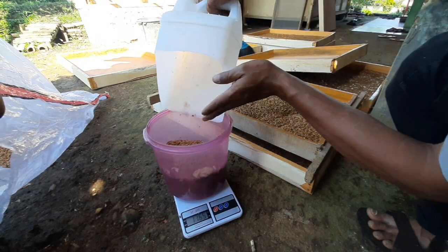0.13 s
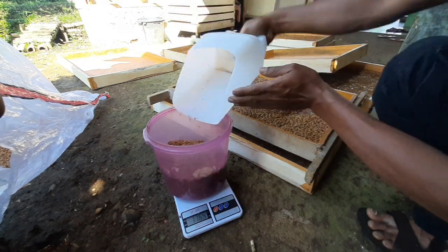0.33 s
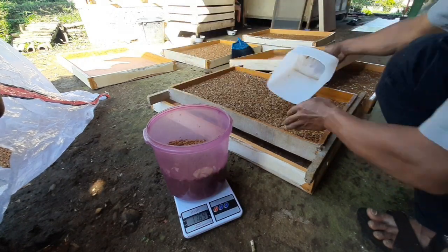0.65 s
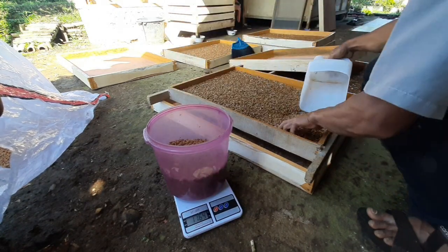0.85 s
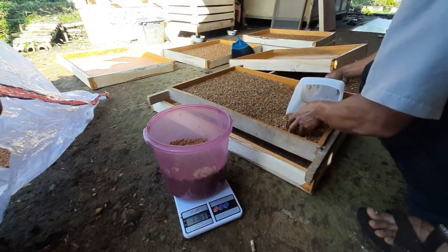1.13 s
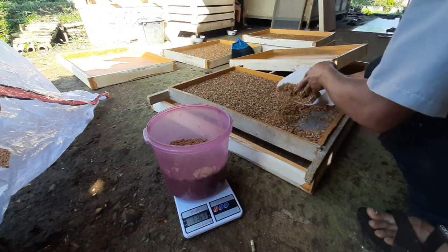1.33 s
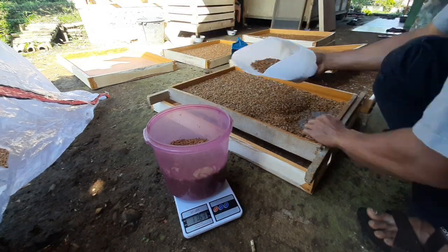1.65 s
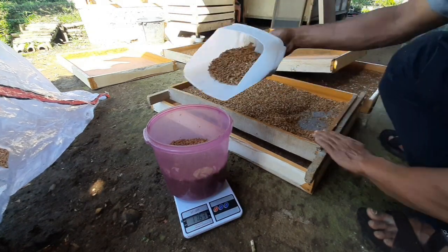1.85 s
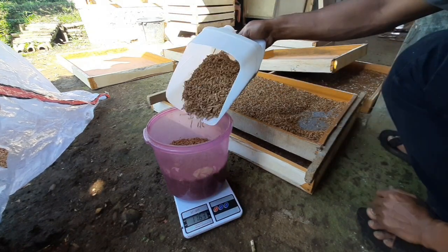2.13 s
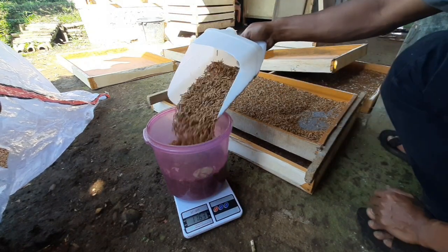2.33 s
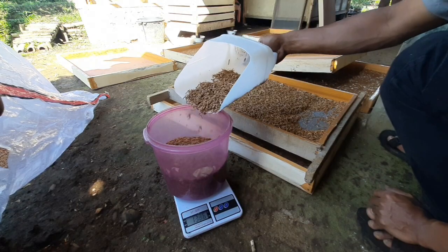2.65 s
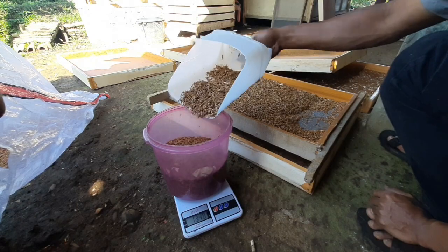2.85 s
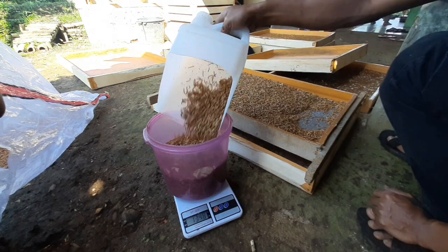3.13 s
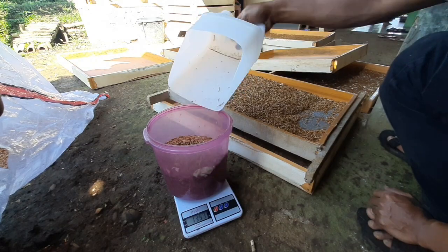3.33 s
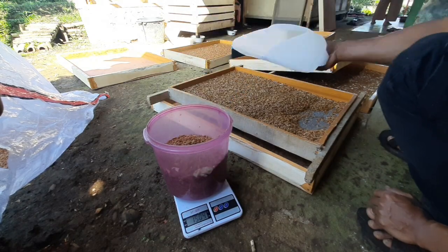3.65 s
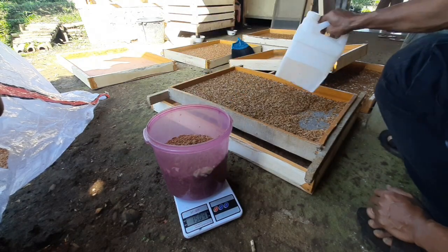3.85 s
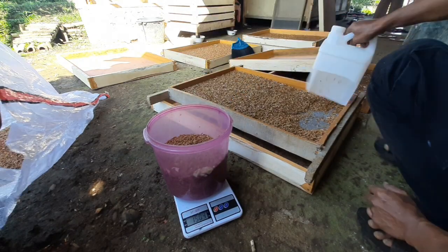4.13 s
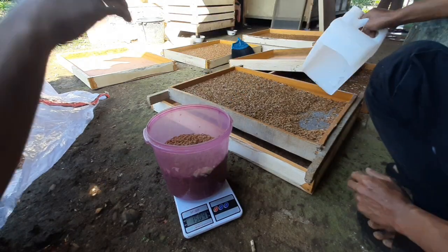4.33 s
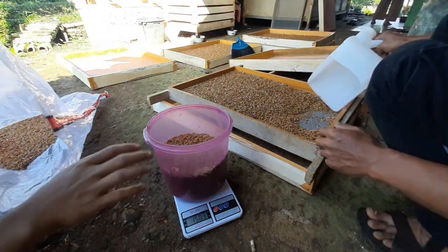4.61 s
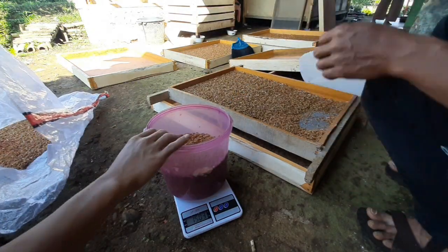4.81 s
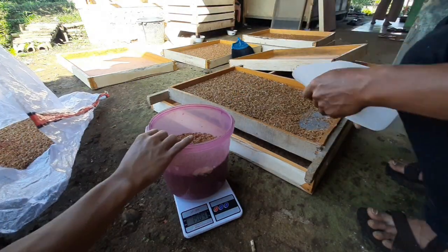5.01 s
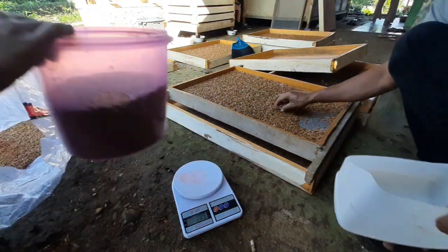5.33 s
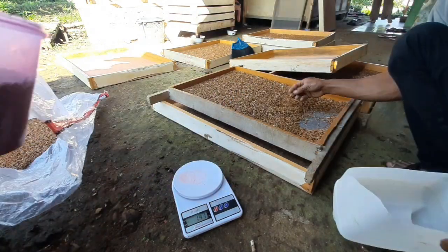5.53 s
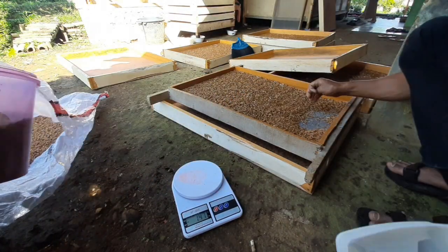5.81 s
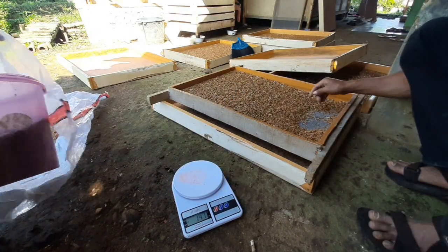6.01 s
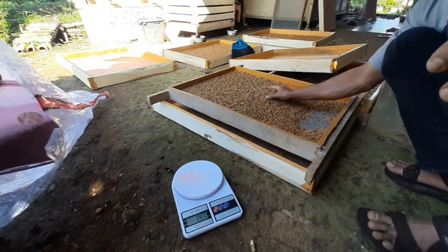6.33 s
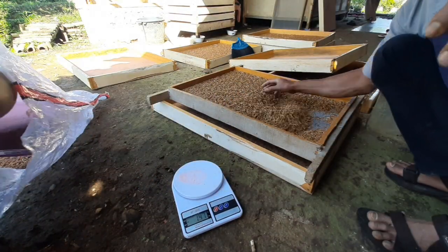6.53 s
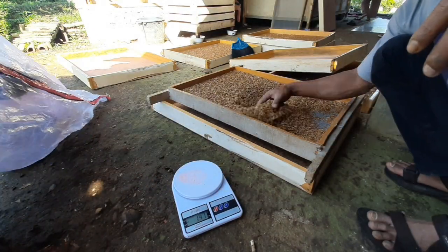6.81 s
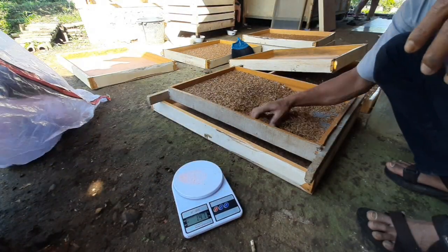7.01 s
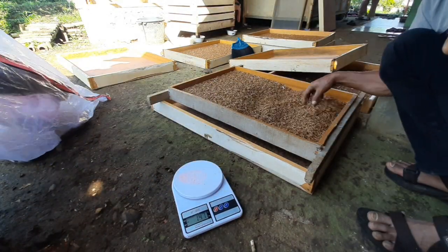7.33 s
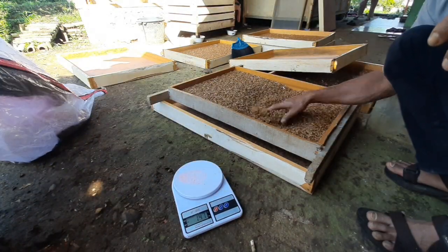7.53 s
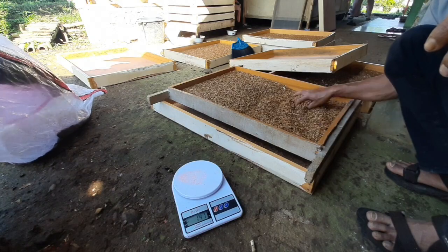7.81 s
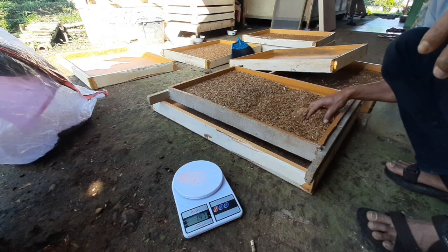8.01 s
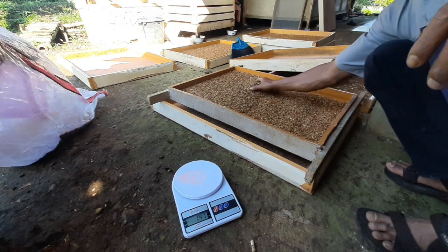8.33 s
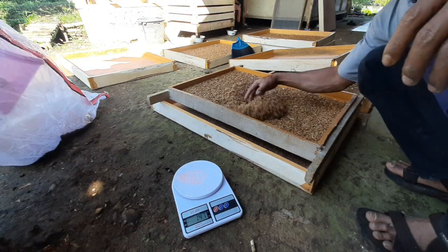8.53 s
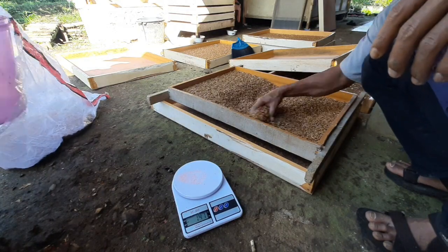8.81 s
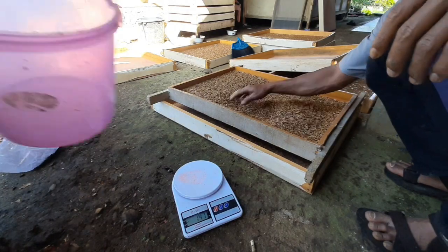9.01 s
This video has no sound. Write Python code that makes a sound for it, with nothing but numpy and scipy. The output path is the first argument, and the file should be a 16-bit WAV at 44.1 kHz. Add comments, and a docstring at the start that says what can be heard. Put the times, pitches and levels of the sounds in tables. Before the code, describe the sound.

A faint low rumble and distant drone run throughout, under an open shed. Light plastic taps open the scene. From about 0.8 to 1.6 seconds a plastic jug scrapes through a wooden tray, scooping small worms, with a thud at 1.4. The worms slide into a bucket in two soft, fizzing pours around 2.3 and 3.2 seconds, followed by a tiny high squeak. Clothing rustles, and the empty jug knocks loudly and hollowly on the tray at 4.2 and 4.5 seconds. A plastic sack crinkles from about 5.2 to 6.6, while the jug scuffs and gives another loud clunk at 6. From 7 seconds a hand stirs the worms in repeated grainy sweeps over the rumbling tray bottom, strongest around 8.5, with a sharp plastic snap at 8.7. A bird gives one faint, short buzz at about 9 seconds.

```python
"""Under an open shed, with a drone far away, a cut plastic jug scrapes and bumps through a wooden tray.
It scoops up small live worms and pours them into a bucket, a fizz of tiny contacts; something squeaks.
The empty jug is knocked on the tray, its hollow walls ringing; a plastic sack crinkles as it is set down.
Then a hand stirs the worms over the rumbling tray bottom, and at the end a bird buzzes once."""
import sys
import numpy as np
from scipy import signal
from scipy.fft import rfft, irfft, next_fast_len
from scipy.io import wavfile
from scipy.ndimage import uniform_filter1d

SR = 44100
rng = np.random.default_rng(int(sys.argv[2]) if len(sys.argv) > 2 else 0)


def wav_out(sig):
    """Save sig, one row per channel (or a flat mono array), as 16-bit PCM at SR to the path in sys.argv[1]."""
    wavfile.write(sys.argv[1], SR, np.round(np.clip(np.atleast_2d(sig).T, -1, 1) * 32767).astype(np.int16))


N = 404075
T = np.arange(N) / SR
HIT_T = T[:SR // 3]
LEFT_LAG_S = 0.00024  # the jug reaches the right side first


def amp(db):
    return 10 ** (np.asarray(db) / 20)


def unit_power(x):
    return x / np.sqrt(np.mean(x ** 2) + 1e-20)


def unit_attack(x):
    """Scales a hit to unit power over its first 20 ms."""
    return x / np.sqrt(np.mean(x[..., :SR // 50] ** 2) + 1e-20)


def curve_at(points, hz):
    points_hz, values = np.transpose(points)
    return np.interp(np.log(hz + 1), np.log(points_hz + 1), values)


def add(mix, start_s, sound):
    part = mix[:, max(round(start_s * SR), 0):][:, :sound.shape[-1]]
    part += sound[..., :part.shape[1]]


def swells(rows):
    """One envelope per level column; rise and fall each span 20 dB, and overlaps add in power."""
    t, power = T[::32], 0
    shape = 1.45  # 1 = pointed, 2 = bell
    for peak_s, rise_s, fall_s, *levels_db in rows:
        away = np.maximum((peak_s - t) / rise_s, (t - peak_s) / fall_s)
        power = power + amp(np.array(levels_db)[:, None] - 20 * np.abs(away) ** shape) ** 2
    return [np.interp(T, t, np.sqrt(p)) for p in power]


# Stereo image, centred bass and wide treble: frequency_hz, left_right_correlation
STEREO_LIKENESS = [(60, 0.99), (130, 0.66), (290, 0.45), (640, 0.023), (1400, 0), (15000, 0.018)]
def coloured(x, colour):
    """Shapes a stereo pair to a tone colour that rolls off at both ends."""
    size = next_fast_len(x.shape[1])
    hz, z = np.fft.rfftfreq(size, 1 / SR), rfft(x, size)
    same = np.clip(curve_at(STEREO_LIKENESS, hz), -1, 1)
    z = np.array([z[0], same * z[0] + np.sqrt(1 - same ** 2) * z[1]])
    ends = np.minimum(hz / colour[0][0], 1) ** 2 * np.minimum(colour[-1][0] / (hz + 1), 1) ** 2
    return unit_power(irfft(z * amp(curve_at(colour, hz)) * ends, size)[:, :x.shape[1]])


def noise(colour, size=N):
    return coloured(rng.standard_normal((2, size)), colour)


def brightened(colour, top_db):
    """Lifts or lowers the top octave of a colour."""
    return [(hz, db + top_db * np.clip(np.log2(hz / 6500), 0, 1)) for hz, db in colour]


# Low rumble and steady high hiss, their colours: frequency_hz, level_db
RUMBLE = [(25, -25), (45, -7), (90, -9), (130, -5.5), (200, -6.5), (260, -13), (350, -8), (440, -20),
          (600, -24), (900, -34.5)]
AIR = [(500, -6), (1150, -5.5), (3000, -14), (5000, -9), (6200, -2.5), (6800, 5), (7500, -9), (10000, -9.5),
       (12000, -10.5), (15500, -23)]
# Bands of the far drone: pitch_hz, width_hz, start_db, end_db
DRONE = [(125.4, 12, -52.5, -52.5), (158.3, 5.4, -53.5, -66.5), (260.2, 8.1, -57.5, -53.5),
         (319, 11.4, -61.5, -69.5)]
def background():
    """Low rumble and a wavering far drone under a faint hiss."""
    out = amp(-51.5) * noise(RUMBLE) + amp(-64.5) * noise(AIR)
    for hz, width, start_db, end_db in DRONE:
        band = [(hz - 3 * width, -40), (hz - width / 2, -3), (hz, 0),
                (hz + width / 2, -3), (hz + 3 * width, -40)]
        out = out + amp(np.linspace(start_db, end_db, N)) * noise(band)
    return out


# Reverb time under the shed: frequency_hz, t60_s
SHED_DECAY = [(100, 0.42), (500, 0.12), (2000, 0.13), (8000, 0.26), (16000, 0.084)]
def shed(x):
    """A short, diffuse tail from the roof and the stacked trays."""
    hz, t, z = signal.stft(rng.standard_normal((2, SR // 2)), SR, nperseg=256)
    decay = amp(-60 * t / curve_at(SHED_DECAY, hz)[:, None])
    tail = signal.istft(z * decay, SR, nperseg=256)[1]
    tail = tail * np.minimum(T[:tail.shape[1]] / 0.0098, 1)
    return signal.fftconvolve(x, tail / np.linalg.norm(tail[0]), axes=1)[:, :N]


# A bird's buzzing note and a faint, thin squeak: time_s, lowest_pitch_hz, flick_hz, level_db
BIRD = [(9.044, 2950, 30, -58), (9.054, 3100, 60, -73), (9.062, 3700, 1600, -58), (9.085, 3660, 1520, -55),
        (9.122, 3590, 1250, -54.5), (9.135, 3800, 700, -65), (9.16, 3750, 450, -79)]
SQUEAK = [(3.355, 11600, 20, -82), (3.38, 11380, 20, -63), (3.412, 11450, 20, -67), (3.435, 11300, 20, -71),
          (3.475, 10460, 20, -80)]
def chirp(rows, buzz_hz, waver_hz):
    """A whistle that flicks upward from its lowest pitch, fast and unevenly."""
    time_s, lowest_hz, flick_hz, db = np.transpose(rows)
    waver = unit_power(uniform_filter1d(rng.standard_normal((2, N)), 60))
    flick = np.sin(np.pi * np.cumsum(buzz_hz * (1 + .25 * waver), axis=1) / SR) ** 4
    pitch = np.interp(T, time_s, lowest_hz) + np.interp(T, time_s, flick_hz) * flick + waver_hz * waver
    envelope = amp(np.interp(T, time_s, db, left=-120, right=-120))
    return envelope * unit_power(np.sin(2 * np.pi * np.cumsum(pitch, axis=1) / SR))


def grains(colour, per_s, spread_db):
    """Countless tiny contacts, each a half-millisecond puff; spread_db varies their size."""
    sizes = amp(spread_db * np.minimum(rng.exponential(1, N), 4))
    contacts = sizes * (rng.random(N) < per_s / SR)
    power = signal.lfilter([1], [1, -np.exp(-2 / (.0005 * SR))], contacts ** 2)
    return coloured(np.sqrt(power) * rng.standard_normal((2, N)), colour)


def mottled(x, patchy_db):
    """Each clump and crease favours its own pitches for a few hundredths of a second."""
    z = signal.stft(x, SR, nperseg=512, noverlap=384)[2]
    bands = uniform_filter1d(rng.standard_normal(z.shape[1:]), size=5, axis=0)
    patches = unit_power(uniform_filter1d(bands, size=11, axis=1))
    flicker = unit_power(uniform_filter1d(rng.standard_normal(z.shape[2]), size=5))
    depth = curve_at([(2500, 1), (9000, .45)], np.fft.rfftfreq(512, 1 / SR))[:, None]
    gain = amp(patchy_db * (depth * patches + 0.15 * flicker))
    return unit_power(signal.istft(z * gain, SR, nperseg=512, noverlap=384)[1][:, :N])


# Rustle colours, dull and bright: frequency_hz, level_db
BODY = [(250, -4.5), (600, -3.5), (1100, 0), (1700, -3), (2400, -3.5), (3500, -8.5), (6000, -11)]
FIZZ = [(1500, -14.5), (3200, -6), (4500, -3.5), (6000, -2.5), (7600, 2), (9300, -7), (12000, -1.5),
        (14000, -8.5), (16000, -9)]
def rustle(body, fizz, top_db, per_s, spread_db):
    """A dull rubbing and a bright fizz of tiny contacts, each riding its own envelope."""
    dull = mottled(grains(BODY, per_s, spread_db=-1), patchy_db=3)
    bright = mottled(grains(brightened(FIZZ, top_db), per_s, spread_db), patchy_db=5)
    return body * dull + fizz * bright


# Cloth and foot moves: peak_s, rise_s, fall_s, body_db, fizz_db
CLOTH_MOVES = [(0.27, 0.18, .4, -64, -68), (3.315, .025, 0.045, -57, -68), (3.72, 0.38, 0.42, -66.5, -57.5),
               (3.88, 0.11, 0.11, -54.5, -58), (3.965, .04, .05, -54, -60), (4.07, 0.16, 0.39, -59, -56),
               (4.35, 0.44, 0.27, -51.5, -54), (4.78, 0.36, 0.42, -64, -55.5)]
def cloth():
    """Cloth and feet rub as the worker leans and reaches."""
    return rustle(*swells(CLOTH_MOVES), top_db=3, per_s=3300, spread_db=0)


# Sack crinkles: peak_s, rise_s, fall_s, body_db, fizz_db
SACK_CREASES = [(5.265, 0.095, 0.1, -60, -50.5), (5.465, 0.1, 0.11, -49, -45), (5.7, 0.12, 0.6, -60, -53),
                (5.88, .14, 0.24, -45, -49), (6.03, 0.11, 0.15, -62, -45), (6.23, 0.13, 0.19, -54, -54),
                (6.42, 0.19, .13, -46.5, -50), (6.56, 0.16, 0.093, -56.5, -57)]
def sack():
    """The plastic sack creases under the bucket with a coarser grain."""
    return rustle(*swells(SACK_CREASES), top_db=2, per_s=2400, spread_db=-1.5)


# Low colour of a rubbed container: frequency_hz, level_db
THRUM = [(90, 2), (160, -4), (250, 1), (350, 3), (500, -4.5), (700, -7.5), (1200, -68)]
def thrum():
    """The tray or jug rumbles under moving worms."""
    return noise(THRUM)


# Hand sweeps through the tray: peak_s, rise_s, fall_s, body_db, fizz_db, bottom_db
HAND_STROKES = [(7.02, 0.35, 0.32, -45.5, -47.5, -47), (7.225, 0.1, 0.24, -40.5, -45.5, -38),
                (7.39, 0.13, .15, -40.5, -44.5, -59), (7.64, 0.19, 0.13, -48, -50, -50.5),
                (7.81, 0.076, 0.32, -49, -50.5, -51.5), (7.93, 0.053, 0.39, -58.5, -55, -54.5),
                (8.1, 0.026, 0.042, -43, -45, -44), (8.19, 0.17, 0.25, -49, -52, -55),
                (8.37, 0.19, 0.22, -45, -42, -45.5), (8.465, 0.032, 0.1, -36, -38.5, -39.5),
                (8.56, 0.31, 0.26, -39.5, -40.5, -46.5), (8.86, 0.53, 0.13, -50, -49, -50)]
def stirring_hand():
    """The hand pushes worms aside and the tray's bottom rumbles under them."""
    body, fizz, bottom = swells(HAND_STROKES)
    return rustle(body, fizz, top_db=4.5, per_s=7000, spread_db=0) + bottom * thrum()


# Small shifts after the scoop: peak_s, rise_s, fall_s, body_db, fizz_db
WORM_SETTLES = [(1.82, 0.18, 0.18, -61, -54.5), (1.923, 0.018, 0.091, -61, -53)]
def settling_worms():
    """Worms settle in the lifted jug with a fine, high hiss."""
    return rustle(*swells(WORM_SETTLES), top_db=7, per_s=4000, spread_db=-0.5)


# Scoops and pours: peak_s, rise_s, fall_s, flow_db
WORM_SLIDES = [(0.02, .2, 0.22, -60), (1.06, 0.25, 0.22, -54.5), (1.24, 0.19, 0.14, -53.5),
               (1.43, .07, 0.078, -40.5), (1.57, 0.15, 0.14, -58), (2.28, 0.28, 0.28, -47.5),
               (3.16, 0.17, 0.15, -44)]
def sliding_worms():
    """Worms slide over the jug's wall; one flow drives the rubbing, the fizz and the thrum."""
    flow, = swells(WORM_SLIDES)
    rubbing = rustle(flow, amp(-3) * flow, top_db=-3.5, per_s=8600, spread_db=0)
    return rubbing + amp(-1.5) * flow * thrum()


# Transient colours, dull and sharp: frequency_hz, level_db
CLACK = [(300, 6), (700, -3.5), (1020, -4), (1300, -5.5), (1700, -8), (2200, -9.5), (3200, -21),
         (6000, -40)]
TICK = [(1200, 23.5), (2500, -40), (3700, 13), (5000, 9), (7600, 10.5), (9500, -0.5), (12000, 3),
        (16000, -47)]
def contact(colour, decay_s, chatter_db, chatter_s):
    """A short crack that reaches the right side first, with a chatter from all around."""
    crack = noise(colour, size=len(HIT_T))[0] * np.exp(-HIT_T / decay_s)
    direct = np.array([np.interp(HIT_T - LEFT_LAG_S, HIT_T, crack, left=0), crack])
    chatter = noise(colour, size=len(HIT_T)) * np.exp(-HIT_T / chatter_s)
    attack = 1 - np.exp(-HIT_T / (0.093 * decay_s))  # dull contacts start more softly
    return unit_attack((direct + amp(chatter_db) * chatter) * attack)


# Light handling of thin plastic: start_s, snap_db, clack_db, tick_db
PLASTIC_TAPS = [(0.041, -56, -50, -70), (0.131, -50, -72, -65), (0.275, -63, -59, -59),
                (0.353, -46, -46, -46), (0.497, -58, -59, -60), (0.906, -49, -64, -57.5),
                (1.003, -64, -41.5, -71), (1.35, -65, -57, -52.5), (1.803, -40, -60, -57),
                (1.917, -36, -62, -71), (4.486, -35, -73, -58), (4.702, -41, -72, -67),
                (4.767, -39.5, -75, -68), (5.092, -52, -45, -75), (5.214, -49, -75, -63),
                (5.631, -42.5, -61, -58), (5.718, -42, -51, -67), (6.199, -39, -68, -54),
                (6.793, -41.5, -61.5, -57), (7.727, -36.5, -49.5, -50.5), (7.783, -49, -50, -49.5),
                (8.045, -50, -53, -49), (8.713, -27, -42.5, -47.5), (8.97, -45, -55, -60)]
def plastic_taps():
    """Fingers and thin plastic snap without ringing, and a few worms scatter after."""
    out = np.zeros((2, N))
    bright, thin = brightened(TICK, top_db=8), brightened(FIZZ, top_db=10)
    for start_s, snap_db, clack_db, tick_db in PLASTIC_TAPS:
        snap = amp(snap_db) * noise(thin, size=len(HIT_T)) * np.exp(-HIT_T / 0.0019)
        clack = amp(clack_db) * contact(CLACK, decay_s=0.0046, chatter_db=14, chatter_s=0.021)
        tick = amp(tick_db) * contact(bright, decay_s=0.004, chatter_db=6, chatter_s=0.016)
        add(out, start_s, snap + clack + tick)
    return out


# Resonances of the jug's walls and the loaded tray: pitch_hz, level_db, t60_s
JUG_MODES = [(269, -14, 0.127), (306.3, -6.5, 0.14), (400, 1.5, 0.1), (470, -18.5, 0.074),
             (482.4, -3.5, 0.11), (528, -15, 0.086), (569.4, -6.5, 0.058), (677, -26, 0.037),
             (823, -28, 0.19), (1000, -16, 0.067), (1123, -10, 0.024), (1170, -21.5, 0.074),
             (1380, -47.5, 0.081), (1727, -16, 0.091), (2020, -33, 0.092)]
TRAY_MODES = [(67, -11, 0.17), (88, -5.5, 0.29), (113.5, 11.5, 0.088), (158.5, 7.5, 0.17), (187, -3, 0.2),
              (243, 1, 0.16), (298.6, 5.5, 0.086)]
def ring(modes, rise_s, favoured_hz, favour_db):
    """Modes swell as the wall gives, low ones slowest; the contact point boosts a pitch and its octave."""
    t = np.maximum(HIT_T - np.array([[LEFT_LAG_S], [0]]), 0)
    out = 0
    for hz, db, t60 in modes:
        octaves = np.log2(hz / favoured_hz)
        nearness = np.exp(-(octaves / 0.33) ** 2) + np.exp(-((octaves - 1) / 0.096) ** 2)
        cycles = hz * (t - rise_s) + rng.uniform(-.1, .1)
        attack = 1 - np.exp(-(t / rise_s * max(hz / 600, 1)) ** 2)
        out = out + attack * amp(db + favour_db * nearness - 60 * t / t60) * np.cos(2 * np.pi * cycles)
    return unit_attack(out)


# The jug drags on wood and ground: peak_s, rise_s, fall_s, pressure_db
JUG_DRAGS = [(0.05, 0.29, 0.6, -54.5), (0.915, 0.15, 0.12, -45), (1.035, .06, 0.049, -46),
             (1.11, 0.03, 0.036, -37.5), (1.362, 0.032, 0.023, -45.5), (5.035, 0.027, .03, -36),
             (5.82, 0.089, 0.068, -42.5), (5.92, 0.086, 0.043, -46), (6.02, 0.061, 0.11, -31),
             (6.24, 0.08, 0.16, -42.5), (6.345, 0.044, 0.038, -34)]
def jug_scuffs(slips_per_s=570):
    """Small uneven slips keep the jug's walls ringing; their soft push stirs mostly the low modes."""
    pressure, = swells(JUG_DRAGS)
    slips = pressure * rng.standard_normal(N) * (rng.random(N) < slips_per_s / SR)
    low_modes = [(hz, db - 10 * (hz > 700), t60) for hz, db, t60 in JUG_MODES]
    wall = ring(low_modes, rise_s=0.0016, favoured_hz=523, favour_db=17)
    wall += amp(-5) * contact(CLACK, decay_s=0.0016, chatter_db=-1.5, chatter_s=0.0037)
    wall /= np.linalg.norm(wall[0])
    return np.sqrt(SR / slips_per_s) * signal.oaconvolve(slips[None], wall, axes=1)[:, :N]


def brushed_worms(knocks, rise_s=0.02, fall_s=0.013):
    """The harder the jug thuds into the tray, the more worms it brushes aside."""
    push, = swells([(start_s, rise_s, fall_s, thud_db - 16) for start_s, _, _, thud_db, _, _ in knocks])
    return push * (grains(BODY, per_s=8600, spread_db=1.5) + amp(8.5) * thrum())


# Early reflections off ground and roof: delay_s, level_db
ECHOES = [(.0088, -8), (0.0223, -9.5)]
# Hollow hits of the jug: start_s, ring_db, favoured_hz, thud_db, clack_db, tick_db
JUG_KNOCKS = [(0.778, -52, 400, -53, -60, -78), (0.854, -40, 500, -46, -49, -60),
              (1.114, -51, 438, -42, -37.5, -45), (1.400, -34, 70.2, -27, -62, -67),
              (4.160, -18.5, 523, -23, -25, -32), (4.548, -16, 572, -25, -20.5, -31.5),
              (4.646, -26, 565, -31.5, -31, -39.5), (5.016, -40.5, 474, -44, -64, -55),
              (5.812, -39.5, 337, -33.5, -39.5, -66), (6.0223, -14.5, 497, -34.5, -15.5, -28.5),
              (6.111, -25, 495, -51, -22.5, -66), (6.166, -43, 490, -53, -52, -68),
              (6.328, -46, 483, -73, -37, -50)]
def jug_knocks():
    """Each blow cracks at the rim, thuds in the tray and rings the hollow jug; only the ring echoes."""
    hollow, impacts = np.zeros((2, 2, N))
    for start_s, ring_db, favoured_hz, thud_db, clack_db, tick_db in JUG_KNOCKS:
        walls = amp(ring_db) * ring(JUG_MODES, rise_s=0.005235, favoured_hz=favoured_hz, favour_db=15)
        thud = amp(thud_db) * ring(TRAY_MODES, rise_s=0.00565, favoured_hz=favoured_hz, favour_db=17.5)
        clack = amp(clack_db) * contact(CLACK, decay_s=0.0061, chatter_db=-2, chatter_s=0.0051)
        tick = amp(tick_db) * contact(TICK, decay_s=0.0014, chatter_db=-2.5, chatter_s=0.008)
        add(hollow, start_s, walls)
        add(impacts, start_s, thud + clack + tick)
    out = hollow + impacts
    for delay_s, db in ECHOES:
        add(out, delay_s, amp(db) * hollow)
    return out


def scene():
    """Hits and calls with shed reverb, dry rustles a little to the left, and the outdoors behind."""
    hits = jug_knocks() + plastic_taps() + jug_scuffs()
    worms = sliding_worms() + stirring_hand() + brushed_worms(JUG_KNOCKS) + settling_worms()
    rustles = (worms + cloth()) * amp([[.8], [-.8]]) + sack() * amp([[1.6], [-1.6]])
    calls = chirp(BIRD, buzz_hz=300, waver_hz=50.8) + chirp(SQUEAK, buzz_hz=90, waver_hz=61)
    return hits + amp(-14.5) * shed(hits) + rustles + calls + amp(-4) * shed(calls) + background()


def record(dry):
    """The microphone's bass roll-off, then a steep cut of the highest treble."""
    low_cut_hz, high_cut_hz = 34, 15950
    lean = signal.sosfilt(signal.butter(2, low_cut_hz, "highpass", fs=SR, output="sos"), dry)
    lowpass = signal.firwin(511, high_cut_hz, window=("kaiser", 9), fs=SR)
    return signal.oaconvolve(lean, lowpass[None], "same")


dry = scene()
out = record(dry)
wav_out(out)
```